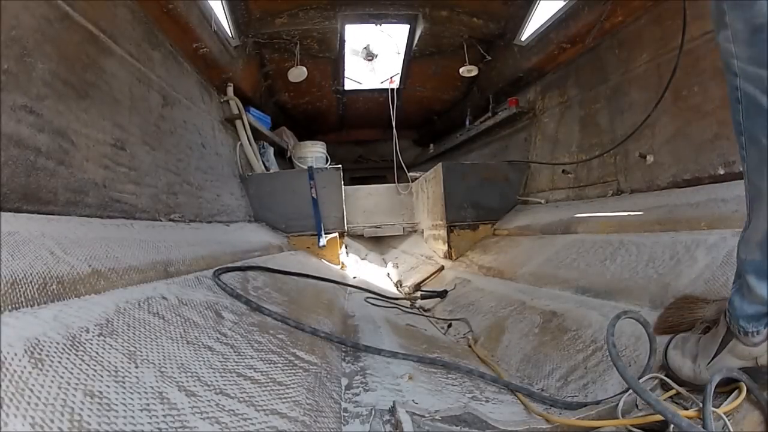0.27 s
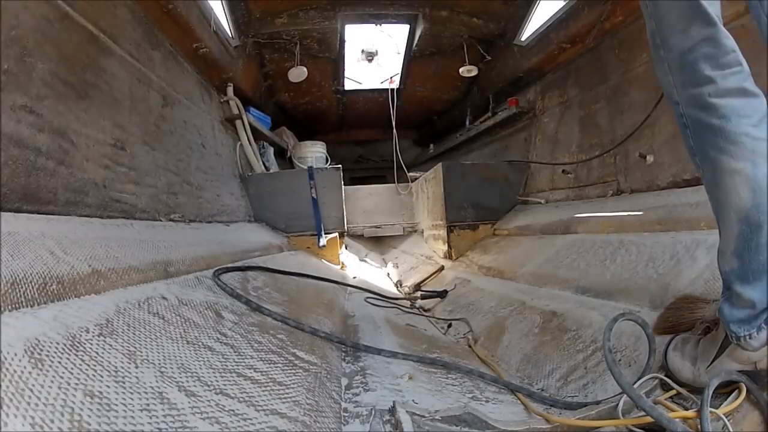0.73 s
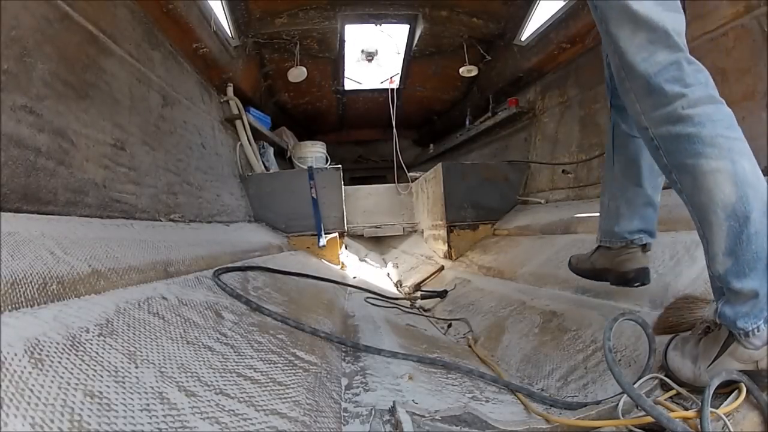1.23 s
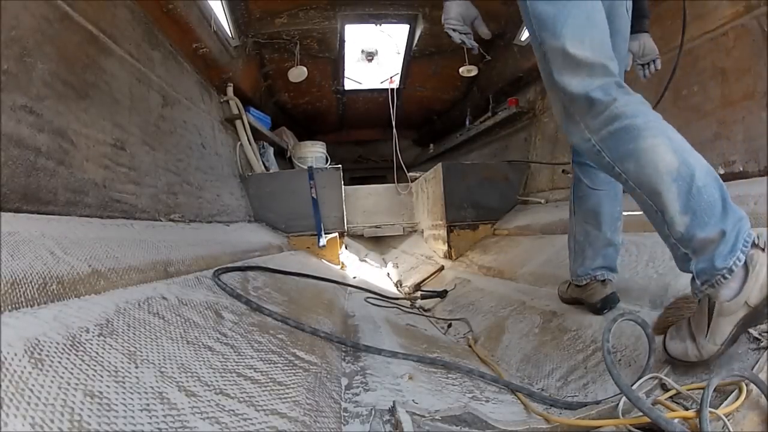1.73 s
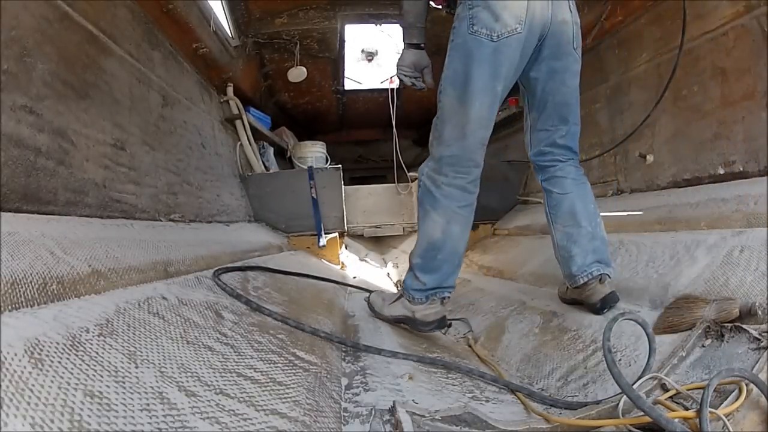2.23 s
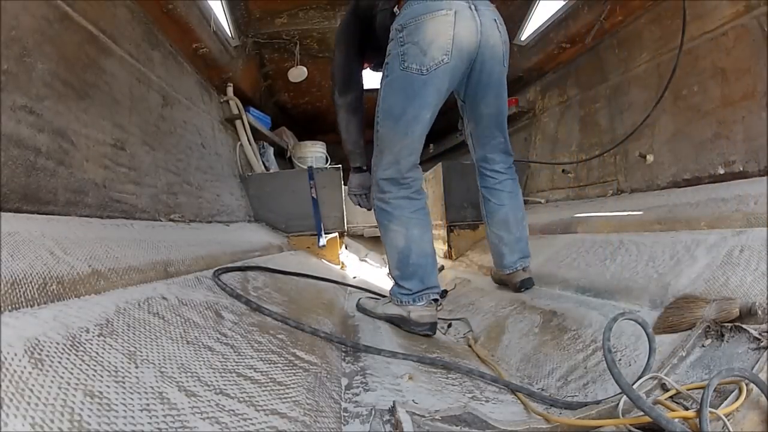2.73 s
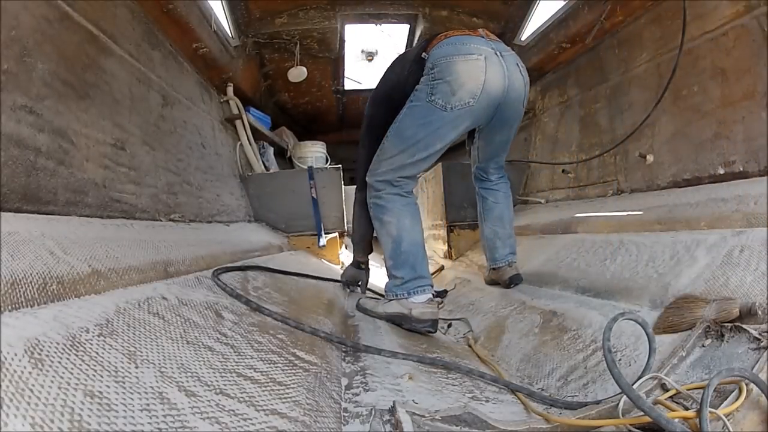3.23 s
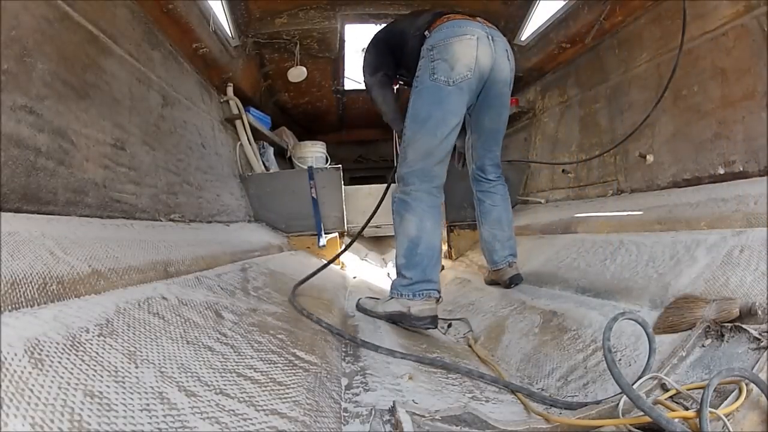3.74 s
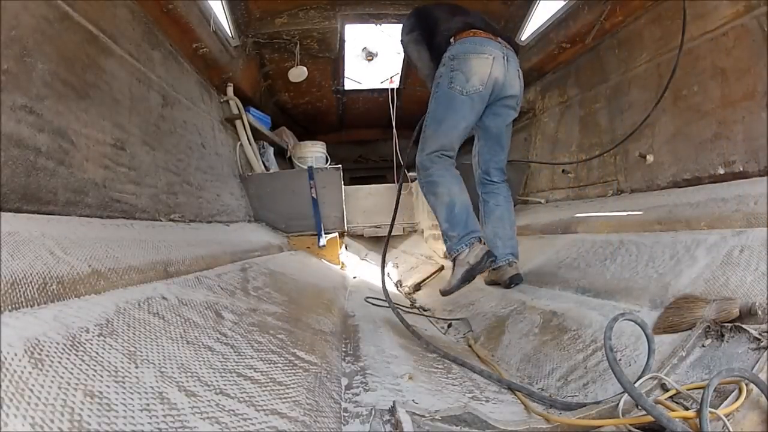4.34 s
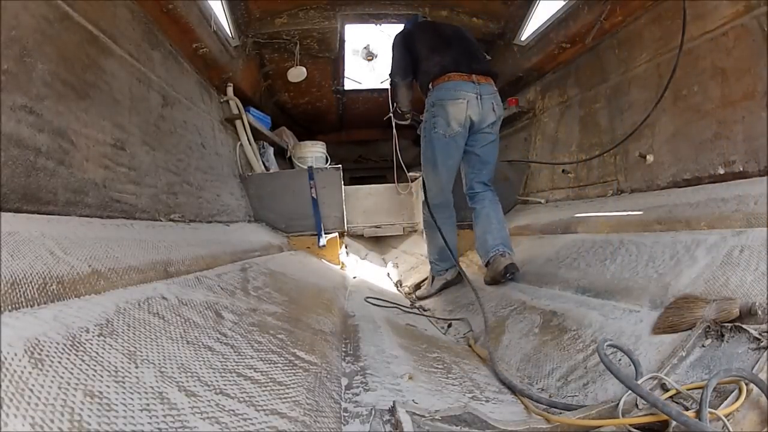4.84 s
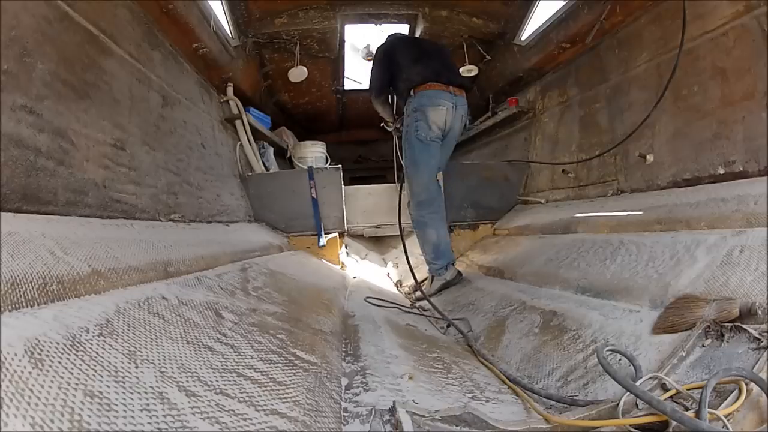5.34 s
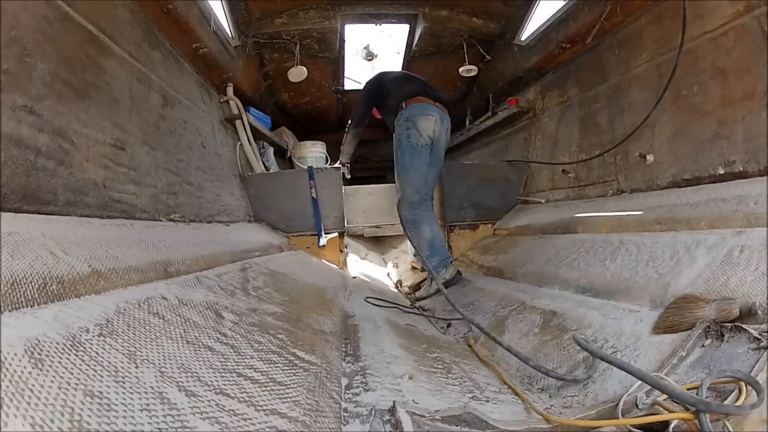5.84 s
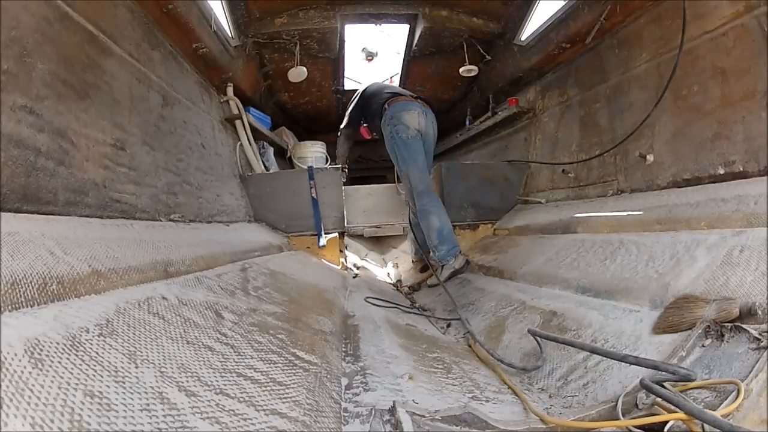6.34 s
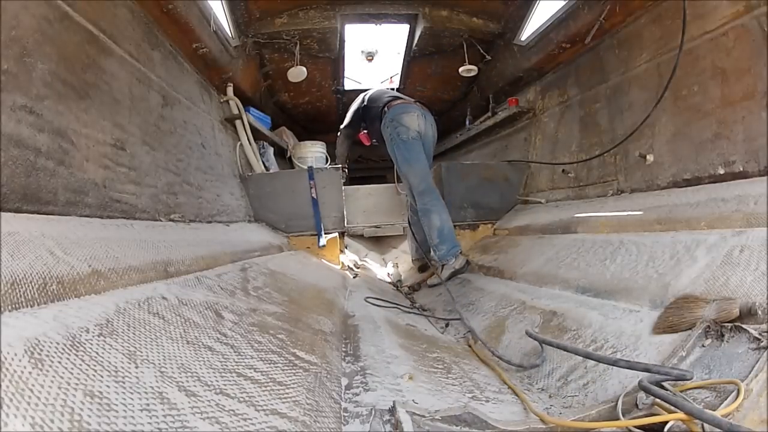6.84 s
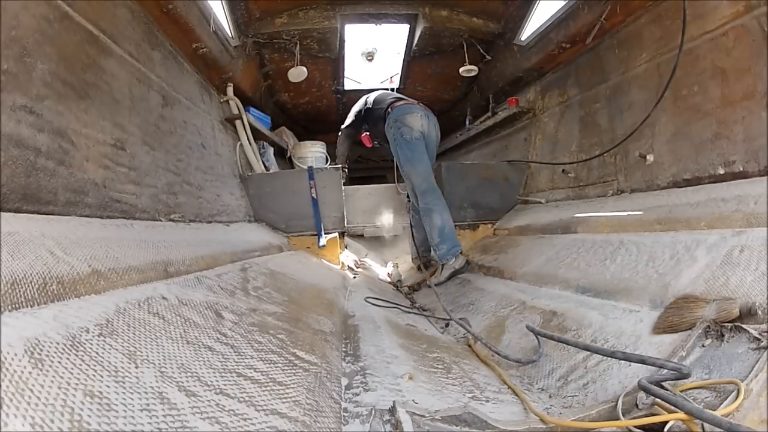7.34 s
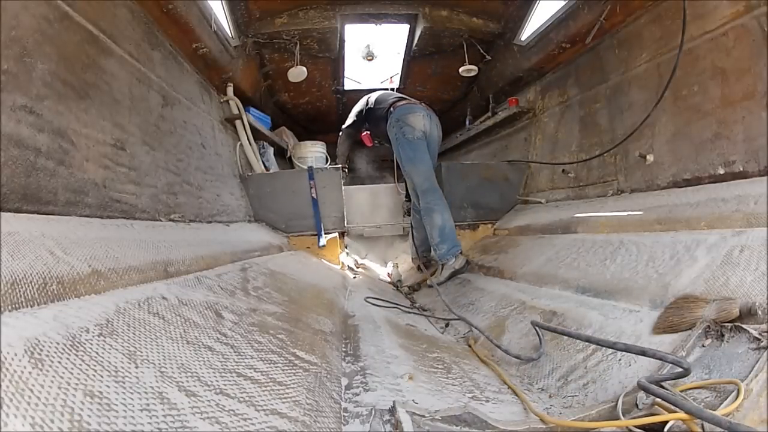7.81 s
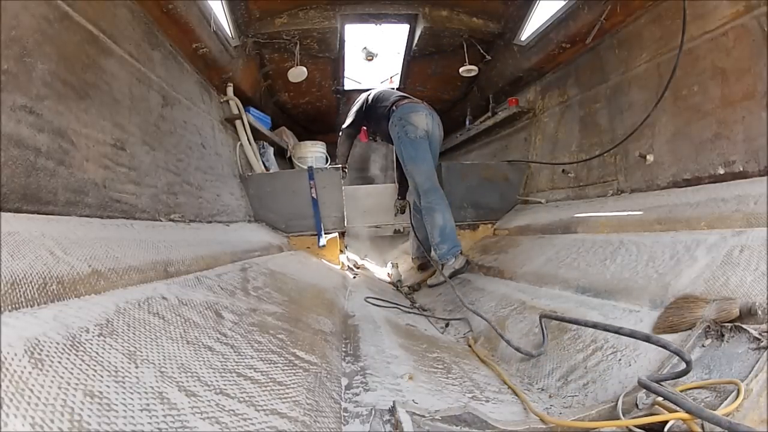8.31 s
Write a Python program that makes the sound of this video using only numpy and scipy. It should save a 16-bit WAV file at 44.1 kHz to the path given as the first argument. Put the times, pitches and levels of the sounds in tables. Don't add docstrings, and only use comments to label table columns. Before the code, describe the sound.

Close, low booms of boots on a resonant shell, each with a small boxy knock from the camera case. Faint motor hum slides downward behind. Midway, a cable rubs over rough weave in a busy burst of scrapes and taps; irregular footsteps and bumps continue, then settle. A faint, muffled grinder rasps at the end. Workshop interior, dull contact pickup with slightly gritty digital highs.

```python
import sys
import numpy as np
from scipy import signal
from scipy.fft import rfft, irfft, next_fast_len
from scipy.io import wavfile
from scipy.ndimage import uniform_filter1d, map_coordinates

SR = 44100
rng = np.random.default_rng(int(sys.argv[2]) if len(sys.argv) > 2 else 0)


def transcribe(u):
    v = np.clip(np.atleast_2d(u).T, -1, 1)
    q = np.round(v * 32767).astype(np.int16)
    wavfile.write(sys.argv[1], SR, q)


def natural_amplitude(level_db):
    exponent = np.asarray(level_db, float) / 20
    return 10 ** exponent


N = 377937
TIME = np.arange(N) / SR

# frequency in Hz, level in dB per Hz.
HISS_COLOUR = [(15, -39), (25, -10), (183, -8.5), (252, -9.5), (573, -18.5), (1040, -23.5), (1300, -23),
               (2110, -20.5), (5260, -39), (5900, -40), (7670, -88), (13000, -120)]
# frequency in Hz, level in dB per Hz.
AIR_COLOUR = [(300, 0.5), (1500, -2), (2600, -3.5), (3500, 1), (5300, -4.5), (5800, -11.5), (6000, -37)]
# frequency in Hz, level in dB.
LAMP_HUM = [(119.5, -64), (240, -70), (360, -75.5), (420, -82), (480, -77.5)]
# frequency in Hz, width in Hz, level in dB.
CASE_LEAKS = [(1556, 37, -4.5), (2091, 121, 4.5), (2404, 91, 2), (2575, 29, 4), (3004, 177, -7),
              (3523, 224, -5), (3870, 1240, -12.5), (4610, 350, -9), (5320, 390, -11.5)]
# time in seconds, turns a second in Hz, hum in dB.
COASTING_MOTOR = [(.3, 113, -57), (.95, 110, -66.5), (1.18, 100.4, -52.5), (1.8, 92.5, -62.5),
                  (2.3, 84.3, -55), (2.95, 76.2, -55.5), (3.2, 73.2, -54.5), (3.65, 71, -54),
                  (3.9, 68, -68), (4.2, 66.5, -58.5), (5.3, 63.5, -62), (6.2, 57, -68)]
# frequency in Hz, level in dB per Hz.
WHEEL_COLOUR = [(1500, -18), (2500, -3), (3500, 3.5), (5000, -0.5), (5900, 1.5)]
# frequency in Hz, level over the rasp in dB, waver in Hz, swell in dB per second.
GEAR_TONES = [(3540, -4.5, 40, -2.5), (4800, -14, 55, 4.5), (5140, -15, 45, -1.5), (5360, -8, 40, -1)]
# time in seconds, turns a second in Hz, hum in dB.
GRINDER_SHAFT = [
    (7.11, 200, -68),
    (7.15, 198.6, -57),
    (7.5, 204, -57),
    (7.74, 202.9, -59),
    (7.85, 190.1, -61),
    (8.0, 189.5, -63),
    (8.25, 181.4, -69),
    (8.57, 192, -68),
]
# time in seconds, sway in dB.
WALKER_LOAD = [(.2, -53), (.95, -58), (1.46, -62.5), (1.64, -40), (2.1, -55.5), (2.53, -42), (2.96, -45),
               (3.2, -53.5), (3.9, -60), (4.27, -53), (4.79, -60), (4.9, -43), (5.6, -60), (5.73, -42.5),
               (6.22, -51), (6.37, -42), (7.1, -66.5), (8.57, -63)]
# frequency in Hz, level in dB.
ROCKING_MODES = [(32.3, -5), (38.3, 1.5)]
# frequency in Hz, width in Hz, level in dB.
SKIN_BOOMS = [(140, 27.5, -7), (172, 26.2, 1.5), (200, 24, -2), (246, 48, -20)]
# frequency in Hz, width in Hz, level in dB.
RUB_MODES = [(342, 70, 1.5), (551, 23.5, -0.5), (636.4, 54, 1), (769, 54, -2.5), (902, 70, -2),
             (1033, 63, 7), (1127, 224, 0)]
# time in seconds, level in dB, half length in seconds, brightness in dB.
SOLE_SCUFFS = [(0.2131, -48.5, 0.0035, -22), (0.731, -62.5, 0.015, 5), (4.3, -73, 0.074, 10),
               (1.543, -62.5, 0.012, -3), (1.754, -71.5, 0.016, 4), (2.351, -67.5, 0.018, -3),
               (2.872, -61.5, 0.046, 4.5), (2.87, -63, 0.0048, 0), (2.85, -63, 0.0083, -10),
               (2.818, -69, .01, -10), (3.527, -58, 0.02, -20), (3.599, -58, 0.023, -20),
               (5.78, -57, 0.04, -22), (6.046, -68, 0.012, -3), (6.25, -65.5, 0.046, 2),
               (6.398, -64, 0.073, -4), (7.176, -67.5, 0.078, 12)]
# frequency in Hz, level in dB per Hz.
GRIT_COLOUR = [(800, 9), (2000, -1), (3000, 7.5), (4500, -6), (5900, -23)]
# start in seconds, hold in seconds, low, ring and rasp levels in dB.
SKIN_SCRAPES = [(.238, .025, -50, -61, -72), (1.532, 0.051, -61, -57, -74), (3.52, 0.04, -61, -60, -67),
                (3.688, 0.025, -56, -58, -62), (3.715, 0.035, -52, -62, -70), (3.775, 0.02, -55, -64, -74),
                (3.809, .075, -54, -63, -70), (3.98, 0.025, -55.5, -71, -73),
                (4.015, 0.059, -48.5, -57, -70), (5.743, 0.074, -67, -61.5, -74),
                (6.2, 0.039, -54, -58, -75), (6.253, 0.042, -56, -56.5, -67), (6.37, 0.073, -67, -61, -71),
                (6.523, 0.021, -64, -60, -65)]
# frequency in Hz, width in Hz, level in dB.
CRACK_MODES = [(1380, 130, -3), (1581, 80, 2), (1940, 120, 2), (1950, 86, -2), (2340, 290, -13.5)]
# frequency in Hz, level in dB, decay by 60 dB in seconds.
HIGH_CASE_MODES = [(941, -4.5, 0.098), (1020, 3, 0.046), (1103, -1.5, 0.063)]
# frequency in Hz, level in dB, decay by 60 dB in seconds.
LOW_CASE_MODES = [(555, -3, 0.076), (642.3, 1.5, 0.1), (755, -7, .06), (820, -3.5, 0.046)]
# frequency in Hz, level in dB, decay by 60 dB in seconds.
PANEL_MODES = [(262, 2.5, 0.091), (316, 0.5, 0.094), (347.2, -4.5, 0.21)]
# frequency in Hz, level in dB, decay by 60 dB in seconds.
BASS_MODES = [(57, -9.5, 0.45), (78.6, 1.5, 0.25), (110, 1.5, 0.23)]
# time in seconds, peak in dB, weight in dB, spot pitch in Hz.
CABLE_SNAGS = [(3.51, -51, 6, 950), (3.629, -56, 8, 950), (3.652, -45, 7.5, 970), (3.673, -41, 3, 945),
               (3.686, -45, 2, 1000), (3.698, -43, 10.5, 1020), (3.712, -49, 11, 980), (3.735, -51, 9, 950),
               (3.762, -43, 6, 1020), (3.812, -49, 11, 1000), (3.83, -50, 4, 1000), (3.857, -41, 5, 1020),
               (3.998, -49, 12.5, 960), (6.163, -54.5, 9, 950), (6.196, -48, 4, 1000),
               (6.213, -51, 5, 1050), (6.235, -49, 6, 1010), (6.268, -49, 5, 1060), (6.284, -53, 11, 960),
               (6.297, -53.5, 10, 960)]
# time in seconds, peak in dB, weight in dB, spot pitch in Hz.
FAR_TAP_EVENTS = [(3.33, -52, 0, 1050), (3.347, -43.5, 1.5, 912), (3.519, -45, 1, 1070),
                  (3.591, -33.5, -10.5, 1105), (3.601, -38, -12, 1090), (4.017, -41.5, 6, 985),
                  (4.044, -32.5, 4, 1070), (4.076, -40.5, -7, 1020), (4.222, -51.5, 16, 1020),
                  (4.434, -35, 2.5, 1020), (4.52, -53, 6, 1000), (5.036, -45, 10, 920),
                  (5.182, -42, -3, 1110), (5.554, -60.5, 11.5, 1058), (5.649, -55, 13, 902),
                  (5.764, -54, 5, 1100), (5.804, -44, -12, 940), (5.952, -52, 3, 1000),
                  (6.012, -48, 6, 1040), (6.042, -41, -3.5, 985), (6.085, -59, 8, 1050),
                  (6.258, -51.5, 9, 1050), (6.333, -45, -5, 1083), (6.52, -44, 3, 1106),
                  (6.535, -51, -4, 1080)]
# time in seconds, peak in dB, weight in dB, spot pitch in Hz.
HEEL_TAP_EVENTS = [
    (2.318, -43, 3, 1050),
    (2.786, -49, -10, 930),
    (2.814, -50, -6, 970),
    (3.407, -41.5, 7, 951),
    (4.818, -40, 10.5, 1020),
    (4.861, -50, 8, 1010),
    (6.185, -41, 6, 940),
]
# time in seconds, peak in dB, weight in dB, spot pitch in Hz.
NEAR_TAP_EVENTS = [(.184, -36, 5, 1100), (.2105, -29.5, -14.5, 1040), (.221, -24, -5, 1020),
                   (.229, -31, -4, 980), (.714, -45, -5, 985), (.868, -40.5, -5, 980),
                   (1.173, -38.5, -9.5, 990), (1.523, -40.5, -12, 1030), (1.533, -42, -9, 1000),
                   (1.545, -42.5, -6, 1060), (1.741, -48, -7, 1070)]
# time in seconds, peak in dB, boom in Hz, 60 dB decay in seconds.
SKIN_BUMPS = [(3.409, -24, 182.4, 0.082), (3.43, -27, 189.5, 0.14), (3.51, -35, 199, 0.46),
              (3.594, -29, 186.5, 0.13), (3.639, -32.5, 195, .13), (3.698, -24.5, 189.5, 0.2),
              (3.72, -25.5, 194.6, 0.21), (3.762, -28.5, 183.5, 0.14), (3.825, -27.5, 188, .12),
              (3.842, -26, 185, 0.17), (3.858, -31, 186, 0.13), (3.996, -25.5, 173, 0.27),
              (4.012, -25, 165, 0.17), (4.076, -33, 173.4, 0.23), (4.048, -17.5, 172.3, 0.11),
              (4.227, -26, 167.5, 0.23), (4.434, -27, 172, 0.069), (5.037, -28.5, 183, 0.13),
              (5.184, -30, 187, 0.096), (5.65, -28, 220.4, 0.14), (5.661, -15, 155, 0.081),
              (5.755, -33, 163, .1), (5.795, -34, 157, 0.15), (6.026, -30, 185, 0.22),
              (6.165, -38, 192, .12), (6.185, -17, 190, 0.073), (6.21, -26, 172, 0.15),
              (6.285, -33, 186, .08), (7.125, -39.5, 180.7, 0.42)]
# time in seconds, peak in dB, boom in Hz, decay by 60 dB in seconds.
BOOT_STEPS = [(.188, -12, 160, 0.15), (.212, -28, 150, 0.07), (.2242, -10, 168, 0.16),
              (.2415, -25.5, 166, 0.088), (.26, -23, 159.5, 0.19), (.283, -28.5, 177, 0.19),
              (.345, -38, 172, 0.15), (.753, -33, 171, 0.18), (.844, -25, 182, 0.08),
              (1.173, -33.5, 184, 0.094), (1.364, -33.5, 172, 0.06), (1.529, -16.5, 170, 0.092),
              (1.5395, -16.5, 172, 0.18), (1.562, -25, 152, 0.091), (1.575, -24.5, 125, .1),
              (1.59, -23.5, 178, 0.13), (1.642, -33, 92, 0.11), (1.67, -29, 171, 0.3),
              (1.742, -31.5, 140, 0.1), (1.763, -35, 185, .2), (2.32, -23.5, 177, 0.13),
              (2.789, -30.5, 163, 0.17), (2.822, -23, 150, 0.052), (2.861, -34.5, 180, 0.2),
              (3.344, -33.5, 194.6, 0.32), (4.515, -31.5, 179.4, 0.079), (4.75, -38, 177, 0.2),
              (4.828, -21, 145, 0.09), (4.864, -26, 160, 0.2), (5.094, -36.5, 180, .13),
              (5.558, -38.5, 175, 0.15), (5.701, -26, 177, 0.089), (6.252, -23, 183, 0.12),
              (6.537, -42, 188, 0.38)]


def unit(x):
    return x / np.sqrt(np.mean(x ** 2) + 1e-20)


def along(points, hz):
    point_hz, db = np.transpose(points)
    return np.interp(np.log(hz + 1), np.log(point_hz + 1), db)


def curves(rows):
    seconds, *columns = np.transpose(rows)
    return [np.interp(TIME, seconds, column) for column in columns]


def wobble(rate):
    return map_coordinates(rng.standard_normal(N // 200), [np.arange(N) * min(rate, 150) / SR])


def tone(hz):
    return np.sin(2 * np.pi * np.cumsum(hz) / SR)


def filtered(x, response):
    length = next_fast_len(N + SR // 2)
    return irfft(rfft(x, length) * response(np.fft.rfftfreq(length, 1 / SR)), length)[..., :N]


def body(modes):
    def response(f):
        return sum((-1) ** k * natural_amplitude(db) * 1j * f * width / (hz * hz - f * f + 1j * f * width)
                   for k, (hz, width, db) in enumerate(modes))
    return response


def resonant(modes, colour):
    return unit(filtered(rng.standard_normal(N), lambda f: body(modes)(f) * natural_amplitude(along(colour, f))))


def ring(modes, t, rise, scatter):
    total = 0
    for hz, db, t60 in modes:
        decay = natural_amplitude(db + rng.normal(0, 2.14) - 60 * t / t60)
        total = total + decay * np.sin(2 * np.pi * (hz * t + scatter * rng.normal()))
    return total * (1 - np.exp(-1.1 * t / rise)) ** 2


def shop():
    air = natural_amplitude(-66.0 + 0.56 * wobble(3.614) + 0.38 * wobble(33)) * resonant(CASE_LEAKS, AIR_COLOUR)
    hum = sum(natural_amplitude(db + 2 + 1.25 * wobble(2.5)) * np.sin(2 * np.pi * hz * TIME) for hz, db in LAMP_HUM)
    hiss = unit(filtered(rng.standard_normal(N), lambda f: natural_amplitude(along(HISS_COLOUR, f))))
    return air + hum + natural_amplitude(-62.0) * hiss


def coasting_motor():
    turn_hz, hum_db = curves(COASTING_MOTOR)
    return natural_amplitude(hum_db + 1.5 + 0.68 * wobble(7.3)) * tone(turn_hz + 0.38 * wobble(6))


def wheel_gain(start_s=6.78, spin_up_s=0.18, rasp_db=-66.5, free_hz=198, bite_db_per_hz=0.1028):
    up = 1 - np.exp(-np.clip(TIME - start_s, 0, None) / spin_up_s)
    shaft_hz = curves(GRINDER_SHAFT)[0]
    return up * natural_amplitude(rasp_db + bite_db_per_hz * (free_hz - shaft_hz))


def grinder():
    whine = 0
    for hz, db, waver_hz, swell_db in GEAR_TONES:
        level = natural_amplitude(db + swell_db * (TIME - 6.78) + 2.6 * wobble(18) + 2.2 * wobble(4.5))
        waver = 1.1 * wobble(4.3) + 0.9 * wobble(22) + 1.2 * wobble(110)
        whine = whine + level * tone(hz + waver_hz * waver)
    rasp = wheel_gain() * natural_amplitude(0.7 * wobble(14)) * (resonant(CASE_LEAKS, WHEEL_COLOUR) + whine)
    shaft_hz, hum_db = curves(GRINDER_SHAFT)
    hum = natural_amplitude(hum_db + 3.5 + 1.8 * wobble(14)) * tone(shaft_hz + 2.5 * wobble(20))
    switch_on = np.clip((TIME - 6.7) / 0.046, 0, 1)
    return switch_on * (rasp + hum)


def scrape_gains(grip_s=0.021, let_go_s=0.052):
    out, t = np.zeros((3, N + SR)), np.arange(SR // 2) / SR
    for start, hold, *levels_db in SKIN_SCRAPES:
        release = natural_amplitude(-60 * np.clip(t - grip_s - hold, 0, 1) / let_go_s)
        shape = np.clip(t / grip_s, 0, 1) ** 2 * release
        out[:, round((start - grip_s) * SR):][:, :len(t)] += natural_amplitude(levels_db)[:, None] * shape
    return out[:, :N]


def hull():
    sway_db, = curves(WALKER_LOAD)
    settle_s = 0.6
    drag = np.abs(uniform_filter1d(scrape_gains()[0], round(settle_s * SR)))
    rocking = sum(natural_amplitude(db + 2.26 * wobble(1.745)) * tone(hz + 0.5 * wobble(3.105)) for hz, db in ROCKING_MODES)
    sway = natural_amplitude(sway_db) * rocking

    bass_db = -56.5 + 0.31 * (sway_db + 54) - 0.83 * TIME + 0.83 * wobble(3.6)
    bass = natural_amplitude(bass_db) * resonant([(78.5, 16, -0.39), (119.0, 15.5, -0.61)],
                                   [(50, -15), (70, -5.0), (130, -1.5), (250, -13.0)])
    boom_gain = natural_amplitude(-53.5 + 0.33 * (sway_db + 46)) + natural_amplitude(6) * drag
    boom = boom_gain * natural_amplitude(0.78 * wobble(25)) * resonant(SKIN_BOOMS, [(100, -15.5), (140, -3.5), (260, 3.5), (600, -6)])

    creep_gain = natural_amplitude(-70.5) + natural_amplitude(-9.5) * drag + natural_amplitude(-13) * wheel_gain()
    creep = creep_gain * natural_amplitude(1.6 * wobble(40)) * resonant(
        RUB_MODES, [(300, 4.0), (460, -9.0), (600, -3.5), (1150, 0.0), (1500, -18)])
    return sway + bass + boom + creep


def scuffs():
    def swell(bright):
        return sum(natural_amplitude(db + bright * fine_db) * np.exp(-((TIME - s) / half) ** 2)
                   for s, db, half, fine_db in SOLE_SCUFFS)
    coarse = swell(0) * resonant(CASE_LEAKS, GRIT_COLOUR)
    fine = swell(0.81) * resonant(CASE_LEAKS[5:], WHEEL_COLOUR)
    return natural_amplitude(2.1 * wobble(90)) * (coarse + natural_amplitude(-8.5) * fine)


def scrapes():
    slips = (rng.random(N) < 500 / SR) * rng.standard_normal(N)
    slips = slips + 0.016 * rng.standard_normal(N)
    total = 0
    for gain, modes in zip(scrape_gains(), (RUB_MODES[:4], RUB_MODES[4:], CRACK_MODES)):
        total = total + gain * unit(filtered(slips, lambda f: body(modes)(f) ** 2))
    return total


def taps(rows, low_db, crack_db, grows):
    rings, cracks = np.zeros(N + SR), np.zeros(N + SR)
    t = np.arange(SR // 4) / SR
    for s, db, weight_db, spot_hz in rows:
        near = [(hz, level - 0.06 * abs(hz - spot_hz), t60) for hz, level, t60 in HIGH_CASE_MODES]
        high = ring(near, t, 0.0012, 0.3)
        low = natural_amplitude(low_db + 0.69 * weight_db + 1.5) * ring(LOW_CASE_MODES, t, 0.0038, 0.42)
        panel = natural_amplitude(weight_db - 4.5) * ring(PANEL_MODES, t, 0.0035, 0.31)
        scrape = natural_amplitude(-60 * t / 0.04) * (1 - np.exp(-t / 0.0002)) * rng.standard_normal(len(t))
        i = round(s * SR)
        rings[i:][:len(t)] += natural_amplitude(db - 1.5) * (high + low + panel)
        cracks[i:][:len(t)] += natural_amplitude(crack_db + grows * (db + 44.5) + 19.0) * scrape
    return np.array([rings[:N], cracks[:N]])


def contacts():
    rings, cracks = (taps(CABLE_SNAGS, low_db=-7.5, crack_db=-55.5, grows=0.89)
                     + taps(FAR_TAP_EVENTS, low_db=-8.5, crack_db=-61, grows=0.29)
                     + taps(HEEL_TAP_EVENTS, low_db=-14.5, crack_db=-61, grows=0.29)
                     + taps(NEAR_TAP_EVENTS, low_db=-9.5, crack_db=-53, grows=0.84))
    return rings + filtered(cracks, lambda f: body(CRACK_MODES)(f) / (1 + 1j * f / 3200) ** 2)


def thuds(rows, bass_db, punch_db, rise=0.0058):
    out, t = np.zeros(N + SR), np.arange(SR // 2) / SR
    for s, db, hz, t60 in rows:
        punch = [(hz, -4, t60), (hz, punch_db, 0.033)]
        beside = [(hz * 0.793, -9, t60 * 0.92), (hz * 1.13, -17, t60 * 0.7), (hz * 0.97, -16, t60 * 2.2)]
        boom = natural_amplitude(db) * (ring(punch, t, rise, 0.02) + ring(beside, t, rise, 0.14))
        bass = natural_amplitude(db + bass_db - 5.5) * ring(BASS_MODES, t, 0.0048, 0.19)
        out[round((s - rise / 2) * SR):][:len(t)] -= boom + bass
    return out[:N]


def scene():
    background = shop() + coasting_motor() + grinder()
    rubbing = hull() + scuffs() + scrapes()
    bumps = thuds(SKIN_BUMPS, bass_db=-24, punch_db=2)
    steps = thuds(BOOT_STEPS, bass_db=-11.5, punch_db=10)
    return (background + rubbing + contacts() + bumps + steps)[None]


def top_cut(x):
    return signal.sosfilt(signal.butter(12, 15510, fs=SR, output="sos"), x)


def record(dry):
    hold_hz, top_hz, mirror_db = 12000, 15380, 0.8
    slow = filtered(dry, lambda f: (f < hold_hz / 2) / np.sinc(np.minimum(f / hold_hz, 0.5)))
    comb = 1 + 2 * np.cos(2 * np.pi * hold_hz * TIME)
    held = filtered(slow * comb, lambda f: np.sinc(f / hold_hz) * (f < top_hz) * natural_amplitude(mirror_db * (f > hold_hz * 0.75)))
    return top_cut(held)


dry = scene()
out = record(dry)
transcribe(out)
```